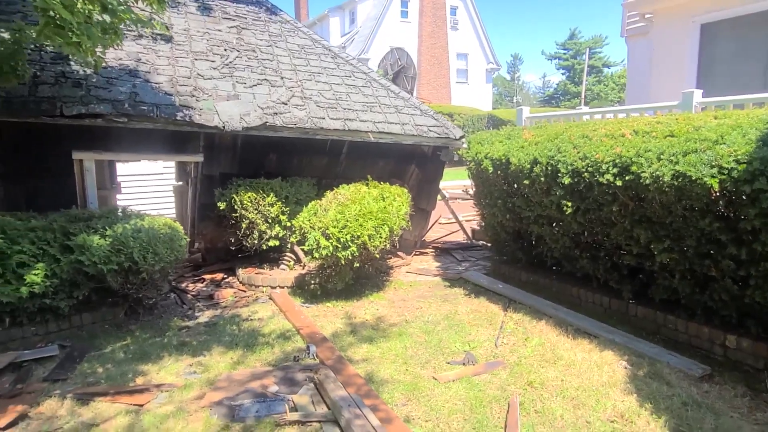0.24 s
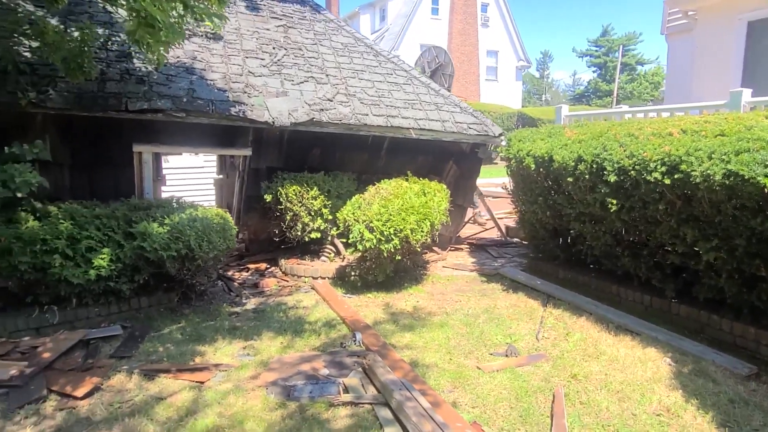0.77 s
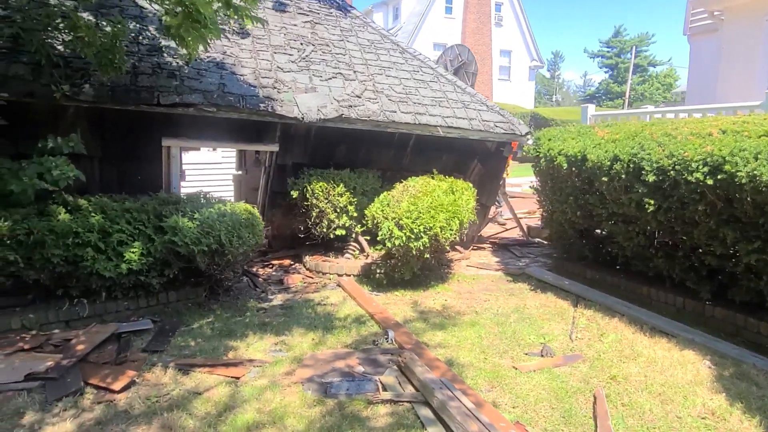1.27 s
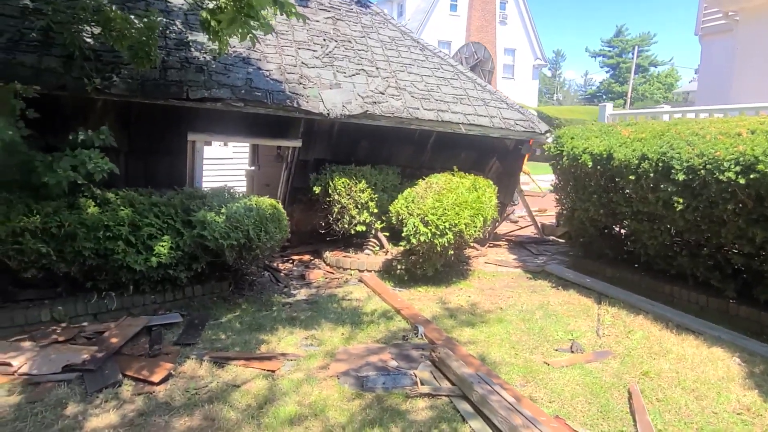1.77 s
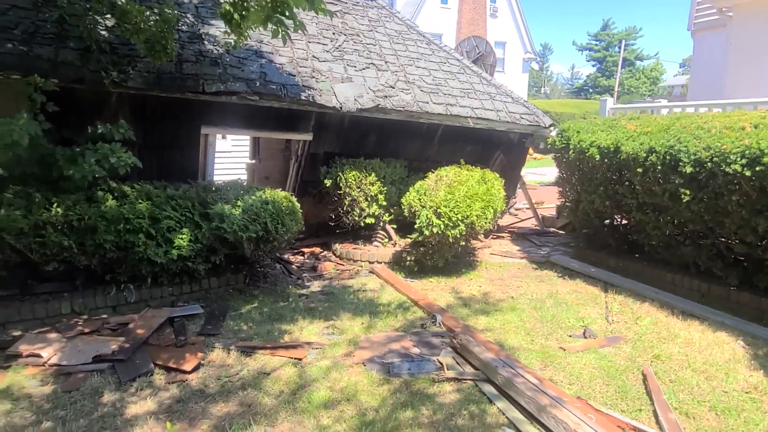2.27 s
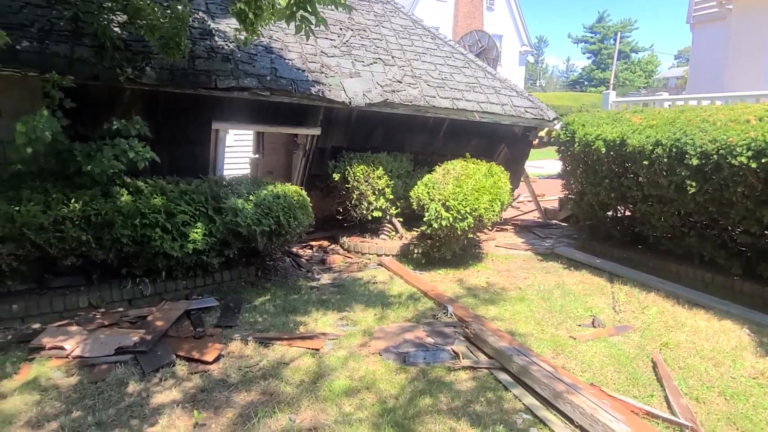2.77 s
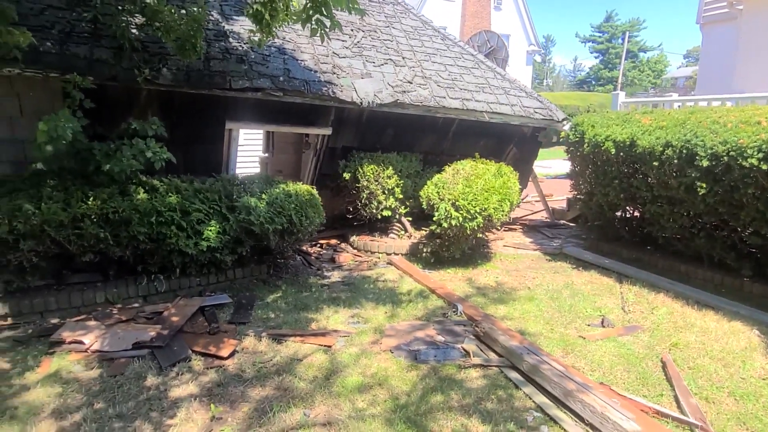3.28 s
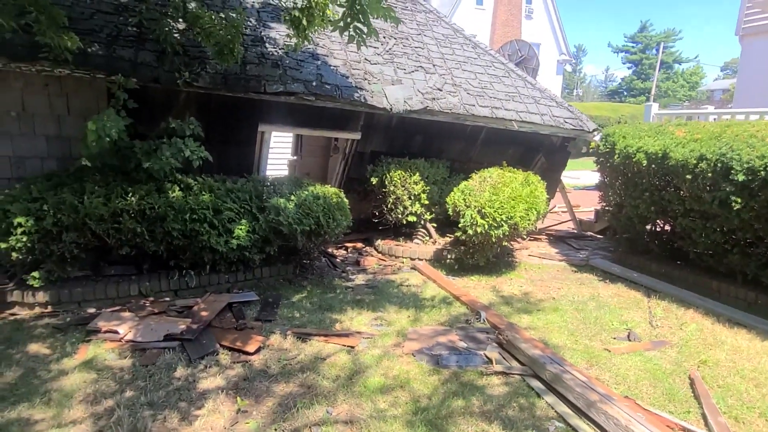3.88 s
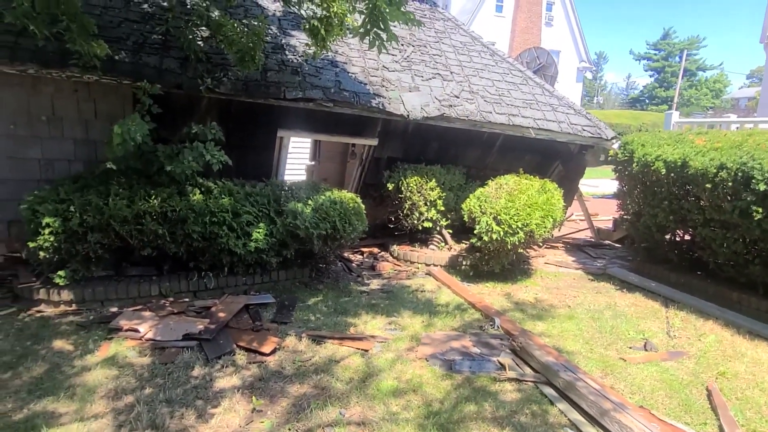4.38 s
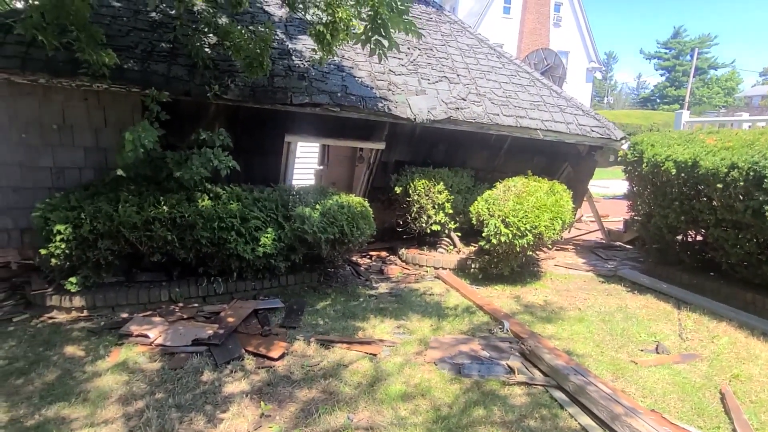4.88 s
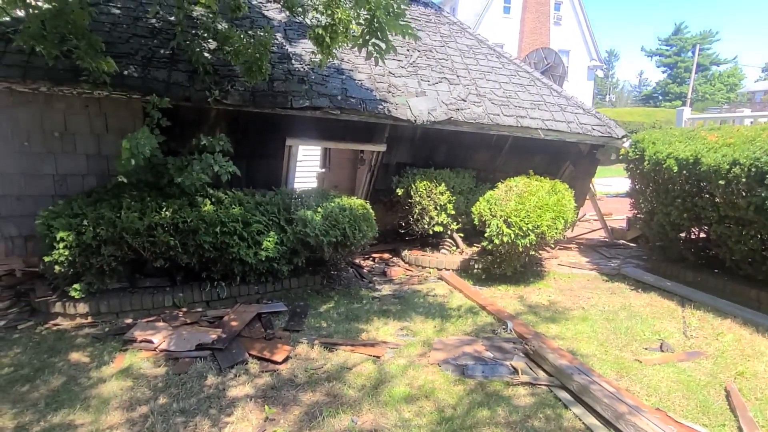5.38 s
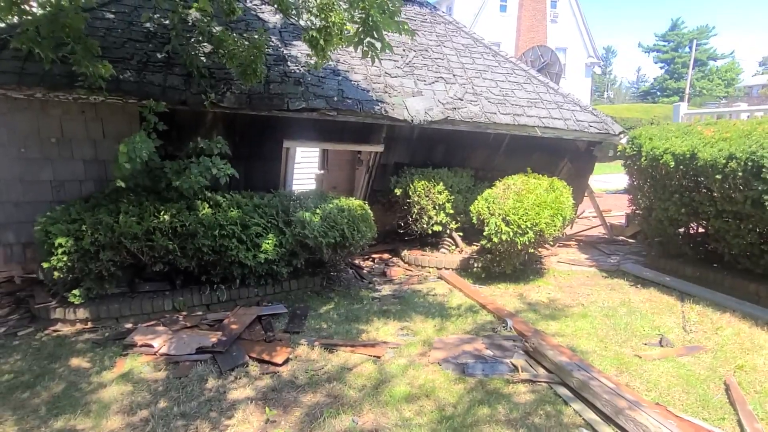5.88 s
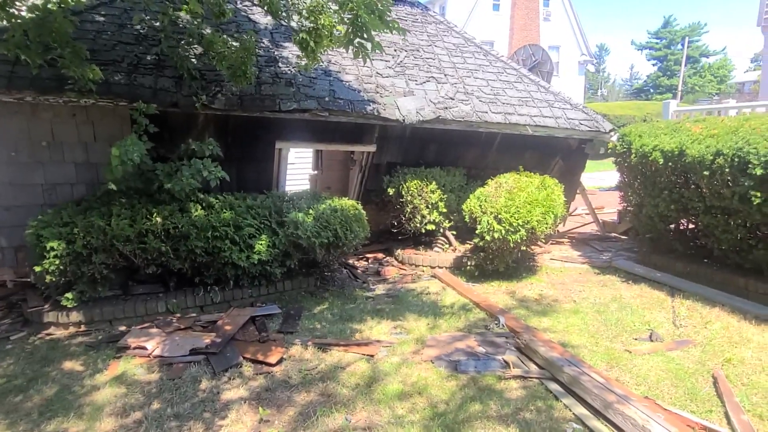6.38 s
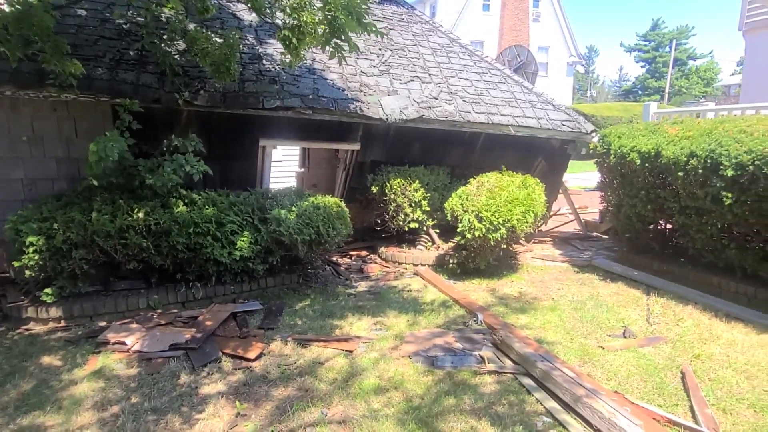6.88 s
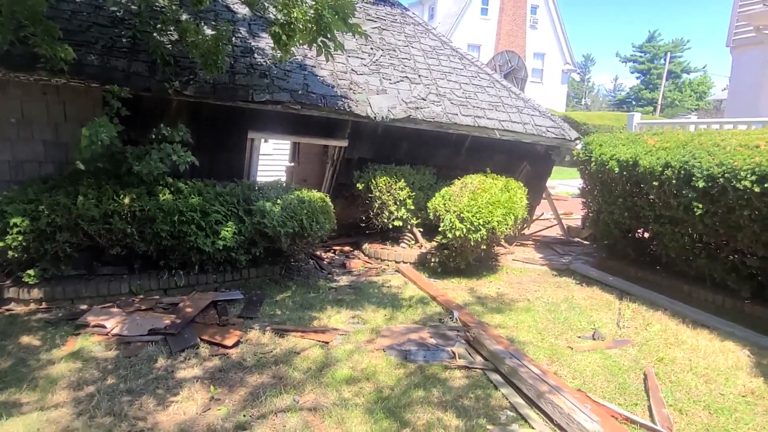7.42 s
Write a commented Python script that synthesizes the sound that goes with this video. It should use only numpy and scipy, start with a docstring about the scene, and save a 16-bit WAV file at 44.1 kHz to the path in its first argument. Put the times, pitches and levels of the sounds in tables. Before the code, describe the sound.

A six-cylinder diesel excavator runs throughout, a low pulsing rumble with mid drone and metallic clatter, heard across a lawn. Hydraulic whine is highest around 0.7 s, easing by 2.4 s. Dry leaves rustle in short swells close to the stereo microphone. A small crack comes at 0.2 s, a firm board knock at 0.57 s, a tiny nail ping at 0.85 s and a dull ground thump at 1.1 s. The engine dips near 2.7 s, then labours. At 3.4 s a beam snaps violently, splintering and grinding as the wall booms, with a board knock at 3.5 s and short house echoes. Light cracks and a knock follow at 4.2-4.6 s, a soft thump at 5.1 s. At 6.65 s a second beam breaks; boards clatter until 6.8 s, duller drops around 7.05 s, a last tick near 7.5 s as the engine eases. Loud blows briefly duck the background.

```python
"""Excavator breaking a wooden garage

An excavator pulls at an old garage, heard from the lawn on the far side of the building. Its six-cylinder diesel
is built from crank-locked tones and noise, the hydraulics from ringing noise, the foliage from swells of grains.
Twice a beam snaps in a run of noise bursts that ring the timber, and the wall booms in decaying sines; boards knock
and drop, echoes answer from the houses around, and the gain ducks under loud blows and creeps back."""
import sys
import numpy as np
from scipy import signal
from scipy.fft import rfft, irfft, next_fast_len
from scipy.io import wavfile

SR = 44100
rng = np.random.default_rng(int(sys.argv[2]) if len(sys.argv) > 2 else 0)


def master(y):
    """Save y as 16-bit WAV."""
    cut = np.clip(np.atleast_2d(y).T, -1, 1)
    pcm = np.round(cut * 32767)  # scale
    wavfile.write(sys.argv[1], SR, pcm.astype(np.int16))


N = 337350
TIME = np.arange(N) / SR   # seconds

# Share of sound common to left and right. Each row: frequency in Hz, correlation.
LIKENESS = [(25, 0.044), (60, 0.81), (130, 0.96), (290, 0.84), (640, 0.59), (1400, -0.39), (3100, 0.024),
            (15000, -0.0051)]
# Echoes between the houses. Each row: frequency in Hz, t60 in seconds, level in dB.
YARD_ECHOES = [(60, 0.96, -12), (250, 0.36, -9), (1010, 0.47, -9), (3130, 0.54, -13), (8000, 0.25, 1),
               (14900, 0.15, 3.5)]
# Colour of the two microphone ports. Each row: frequency in Hz, left gain in dB, right gain in dB.
PORTS = [(500, 0, 0), (1200, -1.5, 1), (1900, -2, 1.5), (3440, -0.5, 0.5), (4500, -1, -1.5),
         (6300, 2, -5.5), (7340, 1, -6.5), (8000, -0.5, -1), (10800, 2.5, 3), (10600, 8.5, 3.5),
         (11800, 5.5, 4.5), (13400, 6, -5.5), (15700, 7.5, -12)]
CUTOFF_HZ = 15900   # top of the sound

# Steady whisper of the leaves. Each row: time in seconds, level in dB.
LEAF_FLOOR = [(0, -63), (0.6, -61), (2.3, -61), (3.2, -56.5), (3.8, -61.5), (5.3, -61.5), (6.5, -58.5),
              (7.6, -63)]
# Louder rustles of the foliage. Each row: peak time in seconds, peak level in dB, t60 in seconds.
RUSTLES = [(0.19, -50, 0.56), (0.32, -52.5, 0.98), (0.445, -48, 0.4), (0.545, -52, 0.21), (0.63, -54, 0.35),
           (0.69, -49.5, 0.54), (0.78, -53, 0.34), (0.95, -50, 0.35), (1.09, -57, 1.0), (1.45, -53.5, 1),
           (1.655, -51.5, 0.52), (1.76, -48.5, 0.45), (1.87, -51, 0.78), (2.07, -49.5, 0.44),
           (2.535, -49, 0.099), (2.61, -50, 0.42), (2.97, -51.5, 0.68), (3.23, -49, 0.4), (3.32, -52, 1),
           (3.78, -46, 0.14), (3.91, -54, 0.3), (4.005, -49.5, 0.25), (4.2, -50, 0.6), (4.48, -54.5, 0.57),
           (4.6, -54.5, 1), (5.64, -47, 0.2), (6.15, -56, 0.72), (6.235, -51, 0.25), (6.36, -60, 0.22),
           (6.455, -48.5, 0.48), (6.565, -52, 1), (6.91, -57, 0.35), (7.05, -49.5, 0.26),
           (7.335, -56, 0.23)]
# Colour of the rustling leaves. Each row: frequency in Hz, relative density in dB per Hz.
LEAF_COLOUR = [(1500, -2), (2800, 12.5), (4500, 6), (6200, 3), (8000, 0), (10000, -1), (12000, 1),
               (15500, 0.5)]
RUSTLE_ATTACK_S = 0.0092
STIRS_PER_S, STIR_DB, STIR_SPREAD_DB, STIR_T60_S = 7, -59, 0.5, 0.28   # faint rustles in between

# Ground thumps under the machine. Each row: start in seconds, level in dB.
THUMPS = [(1.124, -23), (5.126, -27)]

# Oil flow through the valves, high while the arm swings in. Each row: time in seconds, share from 0 to 1.
OIL_FLOW = [(0, 0.8), (0.7, 1), (1.8, 0.45), (2.4, 0.27), (3.9, 0.2)]
# Hydraulic whines. Each row: frequency in Hz, width in Hz, level in dB with the valves shut (before a
# 3.5 dB cut), dB gained at full flow.
WHINES = [(424, 33.5, -56.5, 8.5), (1604, 88, -54, 4.5), (2112, 17, -54.5, -3), (3051, 29, -56, 2)]
WHINE_FOLLOWS_LOAD = 0.86   # dB per dB of load
PUMP_HZ, PUMP_DB = 223, -63.5   # note of the piston pump

# The diesel labours before each beam gives and eases after it. Each row: time in seconds, reference level
# of the exhaust in dB, load in dB.
ENGINE = [(0, -39, -0.5), (0.2, -36.5, -0.5), (0.48, -39, -1.5), (0.75, -36, 0.8), (1.65, -33.5, 0.6),
          (1.9, -39.5, 2), (2.45, -39, -1.1), (2.7, -43, -3), (3.0, -35, 0.5), (3.3, -32.5, 3.5),
          (3.9, -36, -0.3), (4.45, -36.5, -0.6), (4.9, -36.5, 0.6), (5.7, -35, 1.6), (6.55, -34, 2),
          (6.95, -36.5, 0.5), (7.25, -36.5, -3.5), (7.6, -42, -1)]
# Exhaust tones. Each row: multiple of the cycle rate, level in dB before a 2.5 dB cut.
EXHAUST_TONES = [(3, -11.5), (4, -14.5), (5, -18.5), (6, -13.5), (9, -20), (11, -16.5), (12, -18.5),
                 (15, -30.5), (18, -23.5)]
# Colour of the exhaust rumble. Each row: frequency in Hz, relative density in dB per Hz.
RUMBLE_COLOUR = [(18, -27), (30, -4), (45, -1), (68, 2), (100, -10), (135, -9), (160, -4), (210, -10),
                 (280, -15.5), (350, -17), (600, -34)]
# Colour of the engine's droning body. Each row: frequency in Hz, relative density in dB per Hz.
DRONE_COLOUR = [(250, -25), (350, -3), (600, 0), (800, -4.5), (1100, -6), (1400, -11.5), (2000, -45)]
# Colour of the clatter. Each row: frequency in Hz, relative density in dB per Hz.
CLATTER_COLOUR = [(1100, -3), (1600, 9), (2200, 8.5), (3000, 4.5), (3800, 3.5), (4500, -18), (5300, -27),
                  (6200, -38), (7500, -22)]
# Ringing engine panels. Each row: frequency in Hz, width in Hz, level in dB before a 2 dB cut.
PANELS = [(568.8, 15.5, -13.5), (696, 26, -30.5), (1136, 68, -14), (1890, 180, -16.5), (2854, 75, -15),
          (3446, 96, -18), (3700, 290, -18.5), (4677, 210, -18.5), (5910, 620, -22.5)]
CYCLE_HZ = 14.08   # working cycles per second
DRONE_DB, CLATTER_DB = -50.5, -43   # body drone before its beat; reference level of noise and panels
FLOW_DRONE_DB = 1   # the body drones this much more at full flow

# Resonances of the timber. Each row: frequency in Hz, width in Hz, level in dB.
TIMBER = [(224, 108, 15), (437, 115, 6.5), (542, 69, -1), (700, 49, -1.5), (756, 56, -26), (1035, 49, -2),
          (1190, 89, -9), (1388, 170, -26), (1590, 140, -5), (1880, 53, -9), (2150, 32, -12),
          (2990, 190, -12), (3300, 99, -36), (3670, 250, -28)]
# Nails pinging as they give. Each row: start in seconds, level in dB, pitch in Hz, t60 in seconds.
NAILS = [(.854, -33, 4420, 0.027), (4.449, -47, 6730, 0.029)]
# Modes of a nail. Each row: multiple of its pitch, level in dB.
NAIL_MODES = [(.76, -3), (1, -0.5), (1.025, -18), (1.13, -12)]
# Small splinters that crack off. Each row: start in seconds, level in dB, low edge in Hz, t60 in seconds,
# left-right difference in dB.
SPLINTERS = [(0.205, -38.5, 1300, 0.13, 1), (0.739, -43.5, 3800, 0.032, -3), (0.853, -45.5, 3870, 0.02, -1),
             (2.812, -52, 3500, 0.018, 0), (4.202, -35.5, 1750, 0.08, -2), (4.24, -40.5, 1810, 0.097, 1),
             (4.59, -48.5, 4200, 0.03, 1), (6.741, -27.5, 2230, 0.09, 1), (7.594, -49.5, 4200, 0.018, 1)]
SPLINTER_SPAN = 2.86   # high edge over low edge
# Boards that knock and drop; the rows at 3.492 s and 6.739 s are the two beam breaks echoing back from the
# houses. Each row: start in seconds, level in dB, low edge in Hz, high edge in Hz, # t60 in seconds, contact
# click in dB relative to the knock, left-right difference in dB.
KNOCKS = [(0.571, -19.5, 470, 655, 0.062, -8.5, 0), (0.596, -36.5, 850, 1750, 0.14, -26, 1),
          (3.492, -22.5, 350, 2000, 0.08, -22, -2), (3.507, -14.5, 610, 2410, 0.054, -24, -1),
          (4.304, -36, 760, 1520, 0.047, -20, -2), (6.739, -14.5, 280, 1530, 0.07, -18, 1),
          (6.754, -16, 500, 1400, 0.052, -17, -1), (6.7946, -19, 700, 1350, 0.05, -13.5, 3),
          (6.812, -26, 696, 900, 0.037, -15, -5), (7.031, -29, 201, 860, 0.11, -24, -1),
          (7.048, -34, 415, 805, 0.16, -17, 1), (7.076, -32, 198, 790, 0.21, -27, 1),
          (7.518, -34.5, 980, 1170, 0.062, -6, 0)]
CLICK_FROM, CLICK_TO = 1.52, 2.55   # band of the click, in multiples of the knock's high edge
FLEX_DELAY_S, FLEX_DB, FLEX_T60_S = 0.01193, -11, 0.22   # dull thud, level relative to the knock
FLEX_LOW_HZ, FLEX_HIGH_HZ = 80, 270
# Jolts to the wall. Each row: start in seconds, level in dB.
JOLTS = [(3.4175, -3), (3.4280, -5.5), (6.6490, -6), (6.6620, -4)]
# Modes of the wall. Each row: frequency in Hz, level in dB, t60 in seconds.
WALL_MODES = [(98.6, -13, 0.25), (118, -18.5, 0.5), (156.6, -3.5, 0.083), (226.5, -4.5, 0.077),
              (260.6, -4.5, 0.19), (279.6, -1, 0.081), (365, -8.5, 0.083)]
# Beams that break. Each row: start in seconds, level in dB, stretch of the decays, pitch of the wrench in Hz,
# left-right difference in dB.
BEAMS = [(3.4118, 0, 0.87, 550, -0.5), (6.6462, -2, 1.08, 780, -1.2)]
# How every beam breaks: outer fibres snap, splinters fly, the split runs along the grain, the frame shudders,
# strained fibres squeal, the core gives, the halves grind apart. Each row: delay after the beam's start in
# seconds, level in dB, low edge in Hz, high edge in Hz, t60 in seconds before the beam's stretch.
BREAK_STAGES = [(0.0008, -5, 400, 1800, 0.073), (0.002, -13, 1640, 4360, 0.025),
                (0.004, -16.5, 1290, 4200, 0.37), (0.012, -20, 60, 126, 0.26),
                (0.018, -14.5, 1650, 2080, 0.24), (0.025, -8.5, 720, 3900, 0.13),
                (0.042, -20, 450, 1712, 0.28)]
# The beam twists and sounds its own note; the t60 is stretched like the stages.
WRENCH_AFTER_S, WRENCH_DB, WRENCH_SPAN, WRENCH_T60_S = 0.0145, -7.5, 1.26, 0.12


def from_db(db):
    """Decibels to gain."""
    return 10 ** (np.asarray(db) / 20)


def rms_one(x):
    """Scale to rms 1."""
    return x / np.sqrt(np.mean(x ** 2) + 1e-20)


def in_time(rows):
    """Each column of a curve at every sample."""
    s, *columns = np.transpose(rows)
    return [np.interp(TIME, s, column) for column in columns]


def at_hz(points, hz, axis=1):
    """Read one column of a spectrum on a log-frequency axis."""
    points = np.array(points)
    return np.interp(np.log(hz), np.log(points[:, 0]), points[:, axis])


def drift(rate):
    """Smooth random wander with spread 1, made at a fortieth of the sample rate."""
    r = np.exp(-80 * np.pi * rate / SR)
    noise = rng.standard_normal(N // 40 + 2002)
    slow = signal.lfilter([1], [1, -2 * r, r * r], noise)[2000:]   # drop the settling
    return np.interp(np.arange(N) / 40, np.arange(len(slow)), rms_one(slow))


def band(x, low_hz, high_hz, order=2):
    """Butterworth band-pass."""
    high_hz = min(max(high_hz, 1.1 * low_hz), .48 * SR)
    return signal.sosfilt(signal.butter(order, [low_hz, high_hz], "band", fs=SR, output="sos"), x)


def resonate(x, hz, width_hz):
    """A two-pole resonance with about unit gain at its top."""
    r = np.exp(-np.pi * width_hz / SR)
    top = np.array([1, 0, -1]) * (1 - r * r) / 2
    return signal.lfilter(top, [1, -2 * r * np.cos(2 * np.pi * hz / SR), r * r], x)


def stereo(pair, hz):
    """Mix two unrelated signals into left and right, as alike as the likeness table asks at this pitch."""
    alike = np.clip(at_hz(LIKENESS, hz), -1, 1)
    mid = np.sqrt(1 + alike) * pair[0]
    side = np.sqrt(1 - alike) * pair[1]
    return mid + side * np.array([[1], [-1]])


def pan(db):
    """Left and right gains for a level difference, positive to the left."""
    return from_db(np.array([[db], [-db]]) / 2)


def from_left(x, share=0.15, count=22):
    """Feed a share of the left signal's power into the right ear some samples later, as from the left."""
    share = np.clip(share, 0, 1)
    right = np.sqrt(1 - share) * x[1] + np.sqrt(share) * np.roll(x[0], count)
    return np.array([x[0], right])


def add(out, s, sound):
    """Mix a sound in at a given time."""
    at = int(round(s * SR))
    out[..., at:at + sound.shape[-1]] += sound[..., :N - at]


def half_octaves(white):
    """List half-octave bands (centre, low, high, noise pair); neighbours use unrelated draws."""
    edges = 16000 / 2 ** np.arange(10, -.1, -.5)
    return [(np.sqrt(lo * hi), lo, hi, white[k % 2]) for k, (lo, hi) in enumerate(zip(edges, edges[1:]))]


def coloured_noise(spectrum, flicker_db, flicker_rate):
    """Stereo noise whose half-octave bands flicker each on their own; rms 1."""
    out = 0
    for hz, lo, hi, white in half_octaves(rng.standard_normal((2, 2, N))):
        flicker = flicker_db * drift(flicker_rate)
        if spectrum[0][0] < hz < spectrum[-1][0]:
            out = out + from_db(at_hz(spectrum, hz) + flicker) * stereo(band(white, lo, hi), hz)
    return rms_one(out)


def singing(hz, width_hz, drive=1):
    """Noise, such as turbulence, ringing in one narrow resonance; rms 1."""
    noise = drive * rng.standard_normal((2, N))
    rung = resonate(noise, hz, 1.5 * width_hz)
    rung = resonate(rung, hz, 1.5 * width_hz)   # two in a row narrow the peak
    return rms_one(stereo(rung, hz))


def rustle(s, db, t60):
    """Power of one rustle: a quick swell that dies away."""
    t = TIME - s
    swell = np.clip(1 + t / RUSTLE_ATTACK_S, 0, 1)
    return from_db(db - 60 * np.maximum(t, 0) / t60) ** 2 * swell ** 2


def foliage():
    """Leaves brush each other in short swells of fine grains, with faint stirs at random between them."""
    starts = rng.random(N) < STIRS_PER_S / SR
    stirring = starts * from_db(STIR_DB + STIR_SPREAD_DB * rng.standard_normal(N)) ** 2
    decay = from_db(-60 / (STIR_T60_S * SR)) ** 2
    stirs = signal.lfilter([1], [1, -decay], stirring + 1e-18)
    floor_db, = in_time(LEAF_FLOOR)
    power = from_db(floor_db) ** 2 + stirs + sum(rustle(s, db, t60) for s, db, t60 in RUSTLES)
    grains = rms_one(from_db(1.2 * drift(270)))
    return np.sqrt(power) * grains * coloured_noise(LEAF_COLOUR, 1.0, 48)


def yard(x, build_s=0.0032):
    """Scattered echoes from houses and hedges build up, then die away band by band."""
    t, response = TIME[:SR], 0
    for hz, lo, hi, white in half_octaves(rng.standard_normal((2, 2, SR))):
        fade = from_db(-60 * t / at_hz(YARD_ECHOES, hz)) * (1 - np.exp(-t / build_s))
        fade = fade / np.sqrt(2 * np.sum(fade ** 2))   # equal energy however long the tail
        level = from_db(at_hz(YARD_ECHOES, hz, axis=2))
        response = response + level * fade * stereo(band(white, lo, hi), hz)
    return signal.fftconvolve(x, response, axes=1)[:, :N]


def thumps(ground_hz=62, t60=0.18):
    """Dull thuds as the machine's weight shifts, each a decaying low sine."""
    out, t = np.zeros(N), TIME[:SR // 2]
    for s, db in THUMPS:
        add(out, s, -from_db(db - 60 * t / t60) * np.sin(2 * np.pi * ground_hz * t))
    return out


def hydraulics(waver_db=1.95):
    """Oil sings in the valves, following flow and load, over the steady note of the piston pump."""
    _, load_db = in_time(ENGINE)
    flow, = in_time(OIL_FLOW)
    valves = 0
    for hz, width, shut_db, flow_db in WHINES:
        level_db = shut_db - 3.5 + flow_db * flow + WHINE_FOLLOWS_LOAD * load_db
        valves = valves + from_db(level_db + waver_db * drift(2.5)) * singing(hz, width)
    pump_phase = 2 * np.pi * np.cumsum(PUMP_HZ * (1 + 0.00287 * drift(1.74))) / SR
    pump = np.sqrt(2) * np.sin(pump_phase)
    return from_left(valves) + from_db(PUMP_DB) * pump


def diesel():
    """Six firings a cycle puff the exhaust and rattle the engine's panels, harder under load."""
    exhaust_db, load_db = in_time(ENGINE)
    flow, = in_time(OIL_FLOW)
    crank = 2 * np.pi * np.cumsum(CYCLE_HZ * (1 + 0.00852 * drift(1.165))) / SR   # one turn per cycle
    firing = np.cos(6 * crank)
    beat = from_db(0.64 * firing + 0.7 * np.cos(crank) + 1.16 * drift(6.3))   # the cylinders fire unevenly
    tones = 0
    for multiple, db in EXHAUST_TONES:
        tone = np.sqrt(2) * np.sin(round(multiple) * crank + rng.uniform(0, 2 * np.pi))
        tones = tones + from_db(db - 2.5 + 3.2 * drift(4.2)) * tone
    rumble = from_db(-4.0) * coloured_noise(RUMBLE_COLOUR, 1.97, 17.0)
    exhaust = from_db(exhaust_db) * (tones + rumble)
    body_db = DRONE_DB + load_db + FLOW_DRONE_DB * flow
    body = from_db(body_db) * beat * coloured_noise(DRONE_COLOUR, 2.0, 13.6)
    panels = sum(from_db(db - 2 + 3.1 * drift(8.0)) * singing(hz, width, beat) for hz, width, db in PANELS)
    rattle = from_db(-6.5) * beat * coloured_noise(CLATTER_COLOUR, 0.73, 33)
    clatter = from_db(CLATTER_DB + load_db) * (rattle + panels)
    return exhaust * pan(0.25) + body * pan(-0.38) + from_left(clatter) * pan(0.081)


def nails():
    """A nail springs free and rings for an instant in a few decaying modes."""
    out, t = np.zeros((2, N)), TIME[:SR // 5]
    for s, db, hz, t60 in NAILS:
        ping = 0
        for ratio, level_db in NAIL_MODES:
            phase = rng.uniform(0, np.pi, (2, 1))
            ping = ping + from_db(level_db) * np.sin(2 * np.pi * ratio * hz * t + phase)
        add(out, s, from_db(db - 60 * t / t60) * ping)
    return out


def crack(low_hz, high_hz, t60, grain_db=1.5, direct_db=-9, splinter_db=-27, wide_hz=950, side_db=1.0,
          snap_db=5, snap_s=0.0014):
    """A snap and a dying burst of tearing fibres that ring the timber, with a little bright splintering."""
    t = TIME[:SR // 3]
    snap = np.exp(-t / snap_s)
    fade = from_db(snap_db * snap - 60 * t / t60)
    # fibres go in bundles, one a millisecond
    bundles = np.repeat(rng.standard_normal(len(t)), SR // 1000)[:len(t)]
    grain = from_db(grain_db * bundles * (1 - snap))
    fibres = fade * grain * rng.standard_normal((2, len(t)))
    timber = sum(from_db(level_db) * resonate(fibres, hz, width) for hz, width, level_db in TIMBER)
    burst = band(from_db(direct_db) * fibres + timber, low_hz, high_hz)
    splinter_gain = from_db(splinter_db) * min(high_hz / 2000, 1) ** 2   # dull knocks shed few
    splinters = splinter_gain * rms_one(band(fibres, 3200, 11000, order=1))
    mid, side = np.array([rms_one(row) for row in burst]) + splinters
    # mostly the short waves differ between the ears
    side = from_db(side_db) * band(side, wide_hz, CUTOFF_HZ, order=1)
    level = from_db(-0.5) * np.sqrt(np.mean(fade ** 2))
    return level * rms_one(np.array([mid + side, mid - side]))


def splintering():
    """Thin, bright cracks from wood under strain."""
    out = np.zeros((2, N))
    for s, db, low_hz, t60, pan_db in SPLINTERS:
        add(out, s, from_db(db) * crack(low_hz, low_hz * SPLINTER_SPAN, t60) * pan(pan_db))
    return out


def boards():
    """A board knocks with a brighter click at the contact, then flexes with a low thud."""
    out = np.zeros((2, N))
    for s, db, low_hz, high_hz, t60, click_db, pan_db in KNOCKS:
        click = from_db(click_db) * crack(CLICK_FROM * high_hz, CLICK_TO * high_hz, t60)
        knock = crack(low_hz, high_hz, t60) + click
        add(out, s, from_db(db) * knock * pan(pan_db))
        flex = crack(FLEX_LOW_HZ, FLEX_HIGH_HZ, FLEX_T60_S)
        add(out, s + FLEX_DELAY_S, from_db(db + FLEX_DB) * flex)
    return out


def wall(lowest_hz=70):
    """The boarded wall booms like a drum when a beam lets go; neighbouring modes start in opposite directions."""
    out, t = np.zeros(N), TIME[:SR // 2]
    boom = 0
    for k, (hz, db, t60) in enumerate(WALL_MODES):
        boom = boom + (-1) ** k * from_db(db - 60 * t / t60) * np.sin(2 * np.pi * hz * t)
    for s, db in JOLTS:
        add(out, s, from_db(db) * boom)
    return band(out, lowest_hz, CUTOFF_HZ) * pan(1.0)


def beams():
    """Each beam goes through the same quick run of cracks as it breaks, and wrenches at its own pitch."""
    out = np.zeros((2, N))
    for s, db, stretch, hz, pan_db in BEAMS:
        wrench = (WRENCH_AFTER_S, WRENCH_DB, hz / WRENCH_SPAN, hz * WRENCH_SPAN, WRENCH_T60_S)
        for after_s, stage_db, low_hz, high_hz, t60 in BREAK_STAGES + [wrench]:
            burst = crack(low_hz, high_hz, stretch * t60)
            add(out, s + after_s, from_db(db + stage_db) * burst * pan(pan_db))
    return out


def scene():
    """Foliage and machine, with the breaking wood echoing in the yard."""
    machine = thumps() + hydraulics() + diesel()
    wood = nails() + splintering() + boards() + wall() + beams()
    return foliage() + machine + wood + yard(wood)


def record(dry, threshold_db=-14, release_db_per_s=1.5):
    """Colour each port, duck the gain under loud blows and let it creep back, round the peaks, cut the top."""
    size = next_fast_len(N + SR)
    hz = np.maximum(np.fft.rfftfreq(size, 1 / SR), 1)
    port_gains = from_db([at_hz(PORTS, hz, axis=1), at_hz(PORTS, hz, axis=2)])
    heard = irfft(rfft(dry, size) * port_gains, size)[:, :N]
    follow = np.exp(-1 / (0.058 * SR))   # 58 ms level follower
    power = signal.lfilter([1 - follow], [1, -follow], np.mean(heard ** 2, axis=0))
    level_db = 10 * np.log10(power + 1e-12)
    over_db = np.clip(level_db - threshold_db, 0, 5)
    # the deepest duck so far, released at a steady rate
    released_db = release_db_per_s * TIME
    duck_db = np.maximum.accumulate(over_db + released_db) - released_db
    rounded = np.tanh(heard * from_db(-duck_db))
    return signal.sosfilt(signal.ellip(10, .1, 80, CUTOFF_HZ, fs=SR, output="sos"), rounded)


dry = scene()
out = record(dry)
master(out)
```